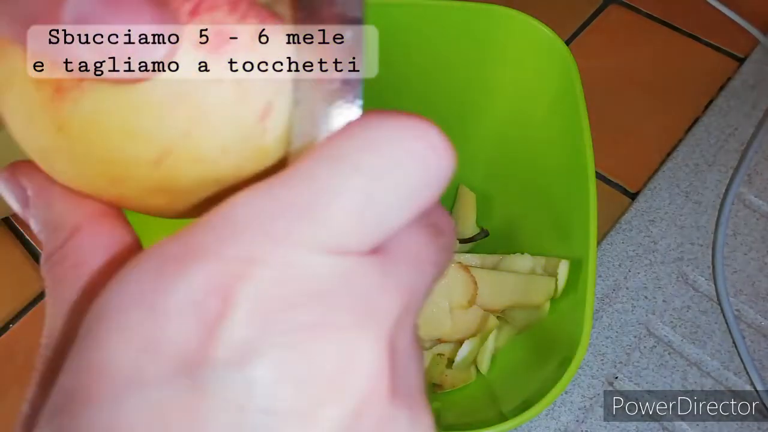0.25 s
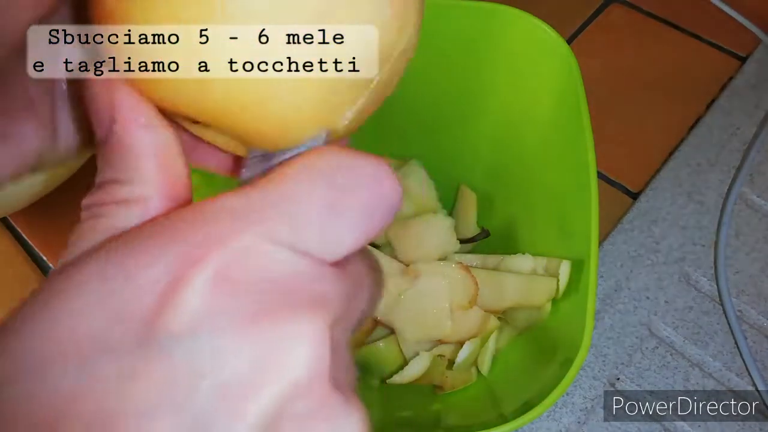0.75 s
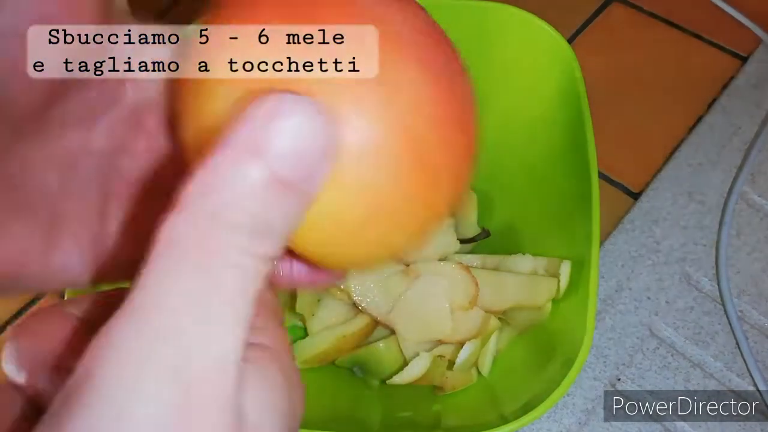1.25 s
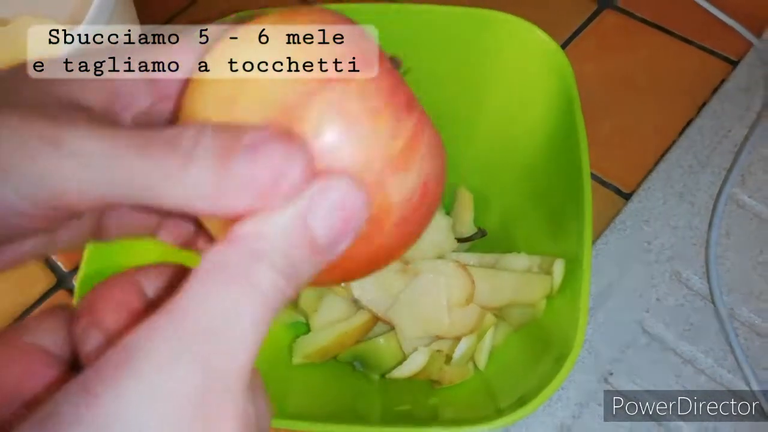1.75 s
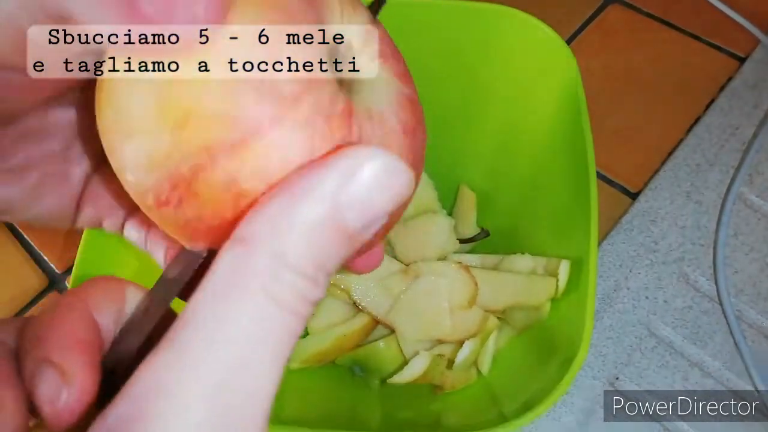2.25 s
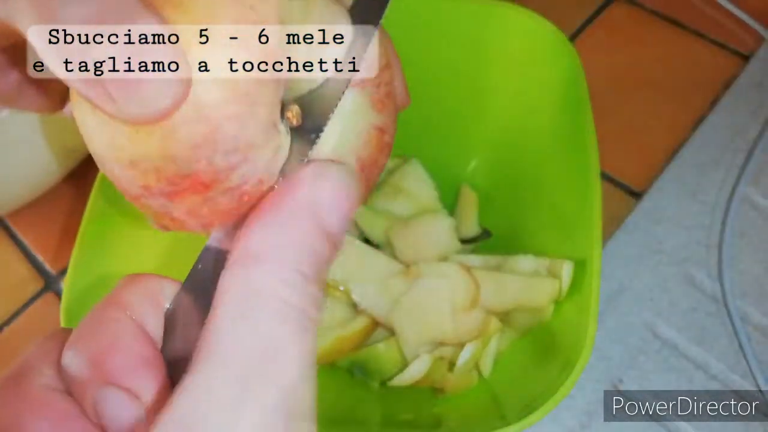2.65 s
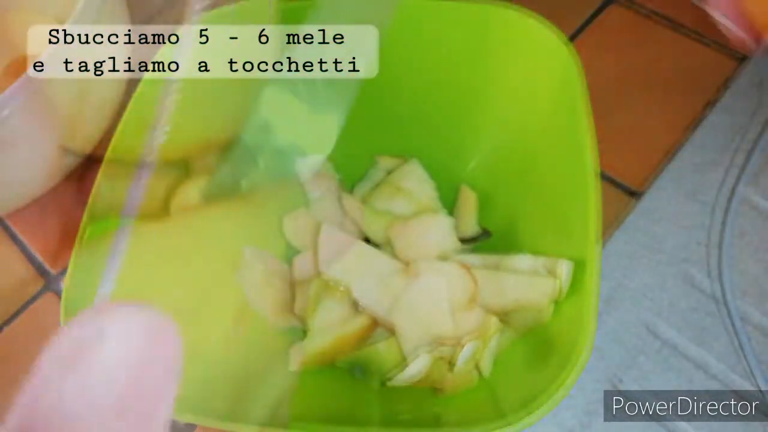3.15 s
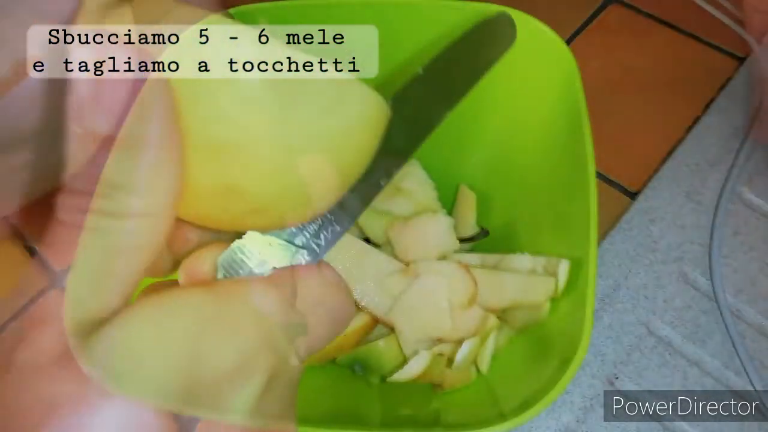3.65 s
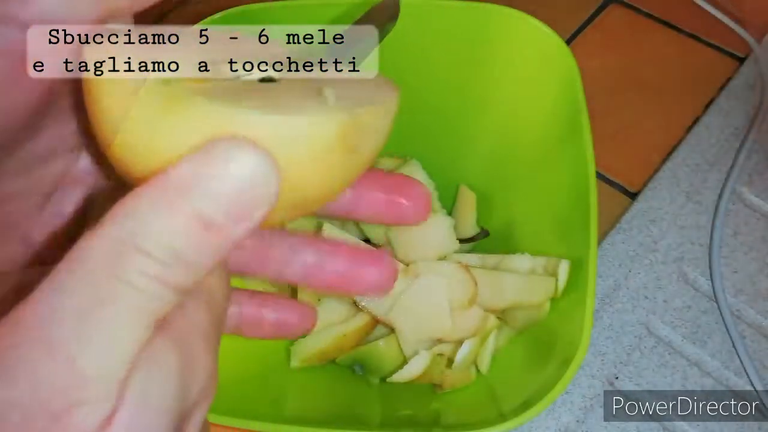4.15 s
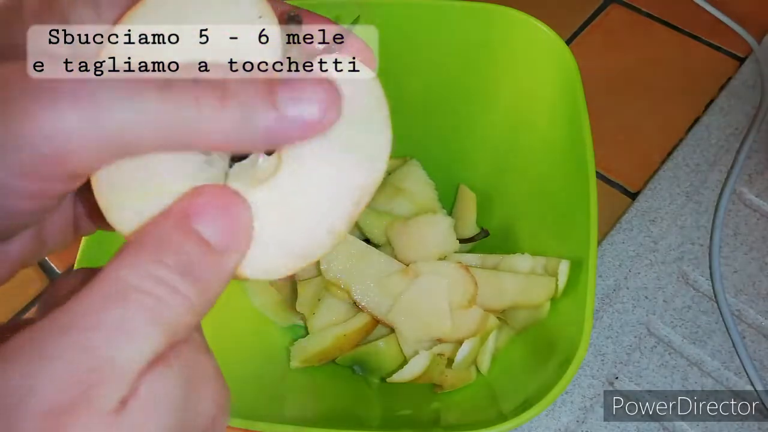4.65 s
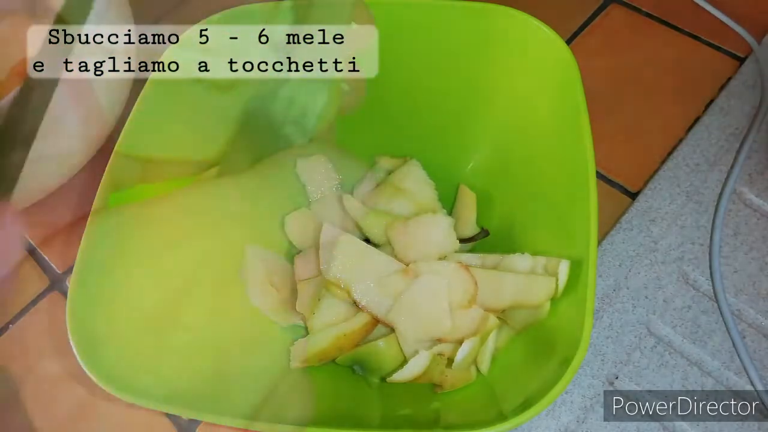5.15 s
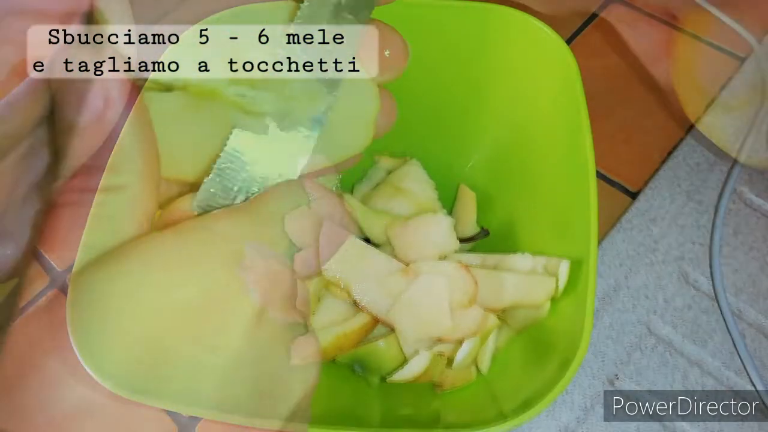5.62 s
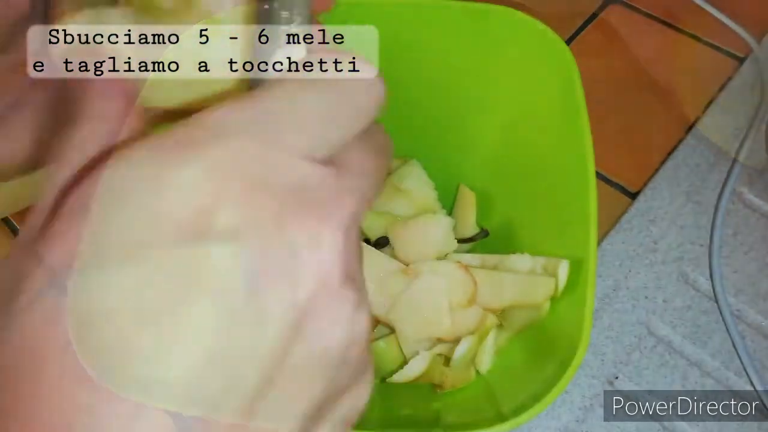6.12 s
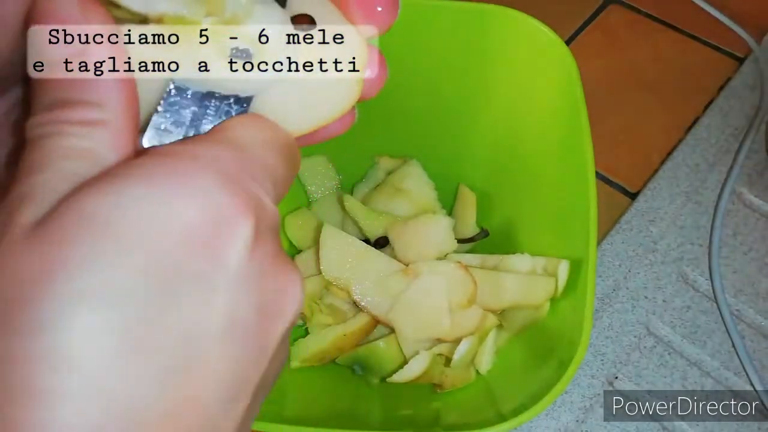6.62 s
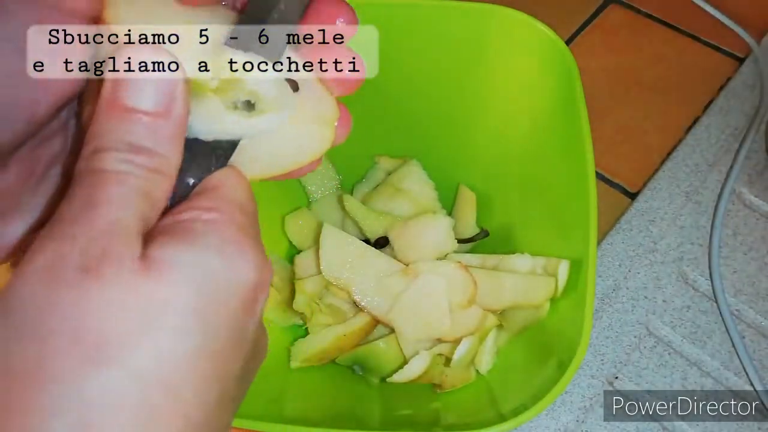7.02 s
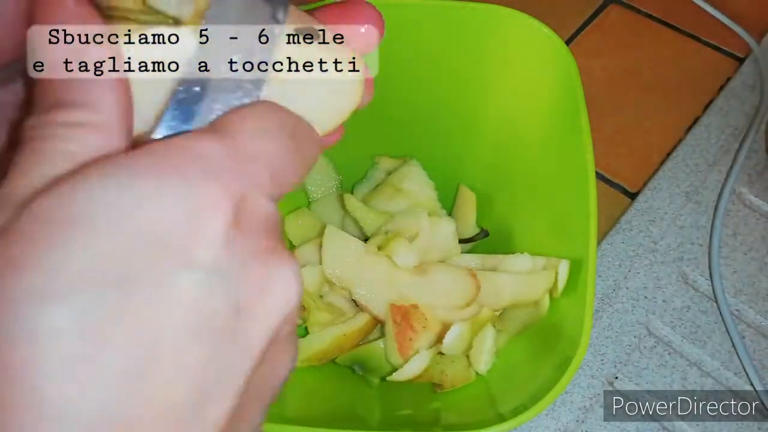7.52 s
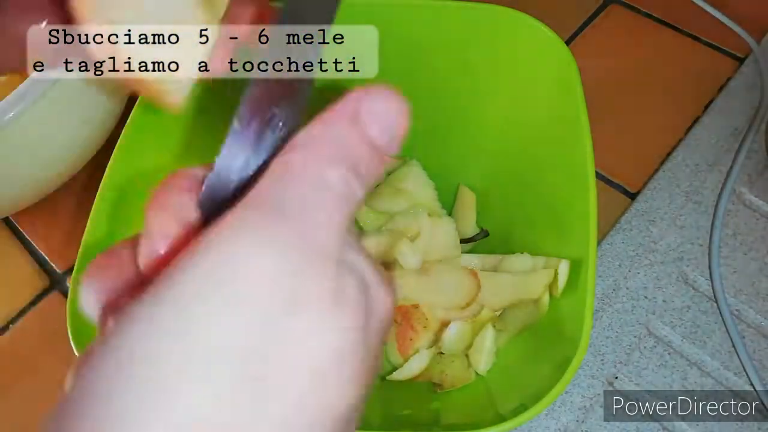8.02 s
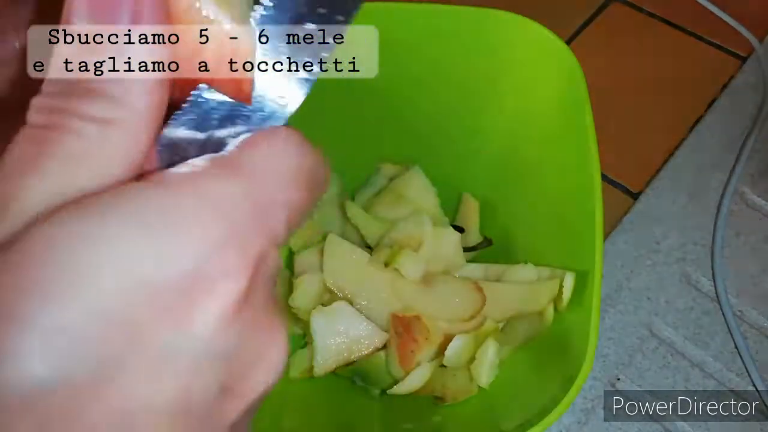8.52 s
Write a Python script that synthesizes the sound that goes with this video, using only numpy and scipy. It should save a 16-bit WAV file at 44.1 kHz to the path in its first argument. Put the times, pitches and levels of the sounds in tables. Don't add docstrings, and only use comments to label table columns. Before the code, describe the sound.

Close, juicy apple cutting with sharp cracks and slicing scrapes in a humming tiled kitchen; halfway it turns double speed, and a piece clatters into plastic.

```python
import sys
import numpy as np
from scipy import signal
from scipy.fft import rfft, irfft
from scipy.io import wavfile
from scipy.ndimage import uniform_filter1d

SR = 44100
rng = np.random.default_rng(int(sys.argv[2]) if len(sys.argv) > 2 else 0)


def voltage_ratio(level):
    return 10 ** (np.asarray(level, float) / 20)


def wrap_up_sound(samples):
    columns = np.atleast_2d(samples).T
    tamed = np.clip(columns, -1, 1)
    steps = np.round(tamed * 32767).astype(np.int16)
    wavfile.write(sys.argv[1], SR, steps)


N = 387198

FIRST_CUT_S, FAST_FROM_S = 3.399, 5.497
T = np.arange(N) / SR
SPEED = np.where(T < FAST_FROM_S, 1, 2)
HZ = np.maximum(np.fft.rfftfreq(2 ** 19, 1 / SR), 1)

# [t/s, length/s, first level/dB, last level/dB, low-part level/dB]
HALVING_SLIDES = [(0, 0.29, -51, -87, 4), (.43, 0.06, -48, -47.5, -2), (.5, 0.21, -54.5, -62.5, 22.5),
                  (.74, 0.069, -25.5, -38.5, 3), (.83, 0.056, -37, -44, 10.5), (.905, 0.017, -27, -38.5, 9),
                  (.94, 0.067, -33.5, -34, 10), (1.02, 0.064, -46, -45, 7), (1.1, 0.22, -50, -46.5, 5.5),
                  (1.33, 0.12, -43.5, -49, 4), (1.46, 0.078, -47.5, -47.5, 7), (1.55, 0.089, -57, -58, 8),
                  (1.65, 0.13, -45.5, -35, 4), (1.81, 0.17, -33, -35.5, 2.5),
                  (2.175, 0.069, -36, -38.5, 4.5), (2.26, 0.044, -46, -52, 7),
                  (2.315, 0.037, -41.5, -42.5, 3), (2.365, 0.13, -41.5, -36, 1),
                  (2.5, 0.075, -35, -22, -0.5), (2.587, 0.81, -54.5, -70.5, 7), (3.33, 0.054, -59, -41, 5),
                  (3.485, 0.31, -54.5, -47.5, 5.5), (3.8, 0.1, -35, -71, 10.5),
                  (3.885, 0.16, -31.5, -33, 7.5), (4.06, 0.052, -49, -44, 12.5),
                  (4.43, 0.042, -46, -29.5, 3.5), (4.465, 0.34, -30.5, -45.5, 7),
                  (4.78, 0.16, -63, -62, 11), (5.0, 0.45, -45, -64, 6.5)]
CORING_SLIDES = [(5.504, 0.075, -43, -47, -9), (5.699, 0.086, -61, -38, -2), (5.844, 0.052, -46, -40, 0.5),
                 (6.274, 0.06, -58, -64, -4), (6.328, 0.15, -50.5, -42, 2), (6.496, 0.17, -43, -55, 1),
                 (6.654, 0.21, -57, -58, 5), (6.906, 0.02, -59, -52.5, 3), (6.95, 0.15, -72, -49, -8),
                 (7.082, 0.14, -53, -50.5, -4), (7.597, 0.18, -38.5, -39, 1.3),
                 (7.791, 0.08, -55, -49.5, -1), (7.91, 0.11, -44, -67, -1), (8.2, 0.17, -69, -55, 12.5),
                 (8.547, 0.25, -46, -39.5, 1.5)]
EDGE_S, RELEASE_S, SLIDE_PAN_DB = 0.021, 0.017, 2.2
HANDLING_DB, HANDLING_LOW_DB = -69, -3
# [t/s, peak level/dB, low-part level/dB, top-part level/dB, T60/s]
HALVING_JERKS = [(0.5018, -13, 4.5, 3, 0.023), (0.5266, -16.5, 4, -1.5, 0.032),
                 (0.56, -17.5, -1, -1, 0.038), (.607, -17, 0.5, 1.5, 0.022),
                 (0.6624, -18.5, -2.5, -2.5, 0.061), (0.737, -24.5, 7.5, -0.5, 0.07),
                 (0.838, -17, -3, -3, 0.024), (0.883, -18.5, 3, -4, 0.025), (.946, -28.5, 8.5, -10, 0.088),
                 (1.082, -25, -11, -7, 0.014), (1.774, -18, 2.5, 2.5, 0.011), (1.81, -24, 3, -2, 0.065),
                 (2.847, -42, 6, 8.5, 0.028), (3.477, -19, 5, 1, 0.045), (3.683, -17.5, -0.5, -3.5, 0.034),
                 (3.799, -22, 2, 5.5, 0.023), (3.834, -18.5, 0.5, 1, 0.03), (4.095, -27.5, 4, -1, 0.028),
                 (4.721, -14, -3, -21, 0.021), (4.75, -31, -18, 2, 0.034), (4.9328, -19, -1, -7, 0.018),
                 (5.062, -24, 1, 2, 0.055), (5.11, -26.5, -4, 0, 0.017)]
CORING_JERKS = [(5.498, -24.5, 4, -11, 0.034), (5.568, -14, -11, -3, 0.022), (5.595, -33, -3, 0, .015),
                (5.606, -19, 0.5, 5, 0.017), (5.708, -28.5, 0, 4, 0.025), (5.785, -33, 7, 3, 0.031),
                (5.793, -32, -9, 0, 0.064), (5.913, -27, -3, -5, 0.013), (6.3405, -33, -2, -4, 0.037),
                (6.356, -40, 3, -5, 0.018), (6.369, -48, 1, -5, 0.02), (6.392, -21.5, 0.5, -8, 0.02),
                (6.404, -30, -1, -3, 0.021), (6.43, -27, -4, 3, 0.018), (6.472, -23, 2, 6.5, 0.021),
                (6.484, -24.5, 2.5, 3, 0.023), (6.555, -17.5, -4, 2.5, 0.019), (6.566, -20.5, -1, -4, 0.02),
                (6.6452, -22.5, -4, 4, 0.024), (6.656, -36, 0, -6, 0.022), (7.117, -21, -8, -2, 0.018),
                (7.226, -32.5, -1, -3, 0.023), (7.767, -31, -5, -3, 0.024), (7.926, -29, -7, 2, 0.043),
                (8.283, -36, 13.5, -4, 0.039), (8.3158, -20.5, 10, -15, 0.019), (8.324, -39, 12, -9, 0.088),
                (8.58, -41, 10.5, 0, 0.065)]
SWELL_S, SWELL_SHARE, JERK_PAN_DB = 0.0073, 0.14, 0.5
# [t/s, peak level/dB, low-part level/dB,
# top-part level/dB, left over right/dB]
SNAPS = [(0.506, -5, 5, -4, 2), (0.5089, -7, 0, 3, 4), (0.5146, -11, 0, -7, 4), (0.63, -27, -3, -5, 2),
         (0.7457, -15, 5, -4, 2), (0.75, -15, -4, -1, 4), (.836, -14, -3, 5, 1), (0.8413, -1, -9, -4, 4),
         (0.8429, -0.5, 0, 2, 4), (0.854, -4, -8, 2, 3), (0.9099, 2.5, 0, -4, 2), (.9438, -18, 5, -3, 2),
         (0.958, -7, -17, 2, 10), (0.967, -16, 14, -4, 0), (0.986, -7, 12, -5, 9), (.992, -10, 2, -2, 7),
         (1.018, -10, 2, -10, 3), (1.086, -1, -3, -11, 6), (1.773, -25, -5, 0, 1), (1.777, -9, -11, 8, 0),
         (1.813, -6.5, 5, -3, 4), (1.827, -23, -2, -7, 3), (2.516, -20, -7, 12, -3),
         (2.5794, -13, 23, -7, 3), (2.693, -37, -20, 3, 3), (2.7096, -31, -18, 6, -3),
         (2.7275, -37, -16, 3, 6), (2.737, -33, -20, 9, 3), (2.745, -28.5, -25, 8, 10),
         (2.804, -29, -15, 0, 3), (2.856, -23, -10, 4, 12), (2.87, -32, -10, 3, 3),
         (3.4905, -18, -6, 6, -2), (3.806, -29, -17, 0, 0), (4.4347, -27, -5, 6, 4),
         (4.467, 3.5, 0.5, -18, 8), (4.478, -18, 3, -12, 3), (4.5041, -5, 7, -13, -1),
         (4.565, -14, 21, -4, 2), (4.6104, -4.5, -10, -9, 9), (4.6285, -3.5, -5, -5, 7),
         (4.6922, -18, 0, -5, 2), (4.7257, 1, 8.5, -16, 2), (4.738, -16, -8, 3, -3),
         (4.937, 0, -1, -0.5, 4), (5.0729, -9, -8, 2, 10), (5.3712, -29, 6, 5, -6),
         (5.514, -24, -5, 0, 2), (5.535, -25, -5, 1, 3), (5.5412, -5.5, -8, -3, 6),
               (5.5728, -6, -9, 0, 9), (5.598, -17, 2, 0, -3), (5.6085, -9, -4, 10, 9),
               (5.614, -16, -4, 3, 3), (5.709, -8, -5, 8, -2), (5.7122, -14, -10, 3, 7),
               (5.723, -20, -6, 2, 5), (5.7454, -16, -9, 9, -4), (5.7735, -10, -5, 6, 8),
               (5.7845, -10, -5, 2, -3), (5.916, -14, -4, -2, 1), (5.931, -15.5, 4, 6, 1),
               (5.961, -26, -8, 4, 1), (6.2894, -36, -8, 0, 2), (6.3174, -33, -5, 0, 2),
               (6.5605, -11, -5, 4, -1), (6.6376, -18, -8, 0, 2), (6.645, -22, -1, 0, 3),
               (6.649, -13, -7, 4, 2), (7.08, -16, -16, 1, 12), (7.118, 3, -22, -1, 1),
               (7.119, -3, -12, -4, 8), (7.19, -18, -9, -3, -4), (7.4694, -37, 0, 6, 3),
               (7.608, -17, -3, -3, 5), (7.931, -26, -10.5, 0, 9), (7.9635, -13.5, 0, -1, 4),
               (8.0149, -29, 10, 0, -5), (8.1156, -28, 9, 2, -2), (8.318, -1, 0, 4, -11),
               (8.3203, -12, 0, 0, -7)]
CRACKS = SNAPS
# [f/Hz, level per Hz/dB]
FLESH_SLOW = [(400, -50), (720, -42.5), (860, -18), (1300, -14), (2200, -12.5), (4500, -10.5), (6200, -9),
              (8300, -7.5), (10200, -1.5), (11800, -9.5), (13500, -17.5), (15500, -20.5)]
FLESH_FAST = [(900, -26.5), (2000, -17), (3300, -5.5), (6000, -2.5), (8500, -2), (11000, -2.5),
              (14000, 0.5), (16500, -6)]
PARTS_HZ = {1: (3500, 7200), 2: (5500, 10500)}
LEFT_LEAD = 10
SHARED = .4
HAND_ECHO, HAND_DELAY_S = .45, .0005
KITCHEN_DB, KITCHEN_T60_S = -11, 0.28

# [f/Hz, rms level/dB, flutter/dB]
FRIDGE = [(80, -63, 3), (90, -63, 3), (100, -42, 0), (110, -53.5, 2.5), (130, -57, 1.1), (140, -66, 2),
          (150, -64, 2), (160, -60, 1.5), (180, -65, 2), (190, -65, 1.5), (344.5, -69, 2)]
# [t/s, level/dB]
IDLE = [
    (0, -36.5),
    (.66, -36),
    (.89, -39),
    (1.05, -37),
    (1.77, -35),
    (2.15, -29),
    (2.5, -30.5),
    (2.95, -43.5),
    (3.4, -37),
]
IDLE_HZ, IDLE_SAG_HZ_PER_S, IDLE_WANDER_HZ = 49.5, .35, 0.32
# [ratio, level/dB]
LEAVING = [
    (3.4, 45.8, -35.5),
    (3.9, 43.7, -33),
    (4.3, 41.1, -40.5),
    (4.52, 42.8, -46),
    (5.0, 45.2, -67),
    (5.3, 45.2, -42),
    (5.5, 46, -56),
]
LEAVING_ORDERS = [(.76, -18), (1, -2), (1.2, -25), (3.1, -22.5), (6.2, -29.5), (9.3, -31.5)]
# [t/s, f/Hz, level/dB]
REVVING = [
    (5.5, 52.5, -65),
    (5.7, 55.1, -59),
    (6.45, 49.7, -58),
    (6.95, 57.6, -57),
    (7.33, 65.9, -41.5),
    (7.7, 74.86, -59),
    (8.2, 87.2, -45),
    (8.45, 91.4, -46),
    (8.78, 96, -42),
]
HOLDING = [
    (5.9, 60.5, -65),
    (6.4, 62.16, -50),
    (6.92, 61.17, -55),
    (7.5, 63.3, -51),
    (7.85, 58.4, -56),
    (8.4, 65.5, -48),
    (8.52, 75.9, -58),
    (8.62, 80.6, -48),
    (8.78, 83.2, -46),
]
SECOND_ORDER_DB = -5.5

AIR_SLOW, AIR_SLOW_DB = [(15, -12), (25, -8), (53, -14.5), (70, -19), (103, -10.5), (190, -20.5),
                         (225, -30), (335, -20.5), (480, -29.5), (700, -27.5), (1000, -31.5), (1600, -32),
                         (5100, -44), (9700, -43.5), (15000, -50)], -47.5
AIR_FAST, AIR_FAST_DB = [(25, -17), (53, -16.5), (90, -6), (140, -19.5), (200, -5.5), (380, -20),
                         (450, -24.5), (630, -18), (685, -16.5), (750, -22), (1230, -29), (2050, -26.5),
                         (4850, -34), (11000, -40), (16000, -43)], -50.5
# [f/Hz at normal speed, left-right likeness]
LIKENESS = [(40, .99), (130, .95), (200, .8), (290, .4), (640, -.35), (1400, .1), (3000, 0)]

# [t/s, peak level/dB, second-mode f/Hz, second-mode level/dB]
JOLTS = [
    (0.5085, -19.5, 1110, -9),
    (.75, -24.5, 1200, 10),
    (0.845, -24, 1500, 0),
    (2.578, -23.5, 1150, -7),
    (3.487, -27.5, 1150, -12),
    (3.691, -23.5, 1190, -3),
    (4.467, -44, 1082, 0),
    (7.119, -41.5, 500, -1),
]
# [f/Hz, level/dB, T60/s]
FRUIT = [(325, -20.5, .06), (872, 0, .035)]
GRIP_T60_S, FRUIT_CUT_HZ = .028, 874

# [t/s, swell/s, fade/s, peak level/dB]
RUBS = [
    (1.17, 0.24, 0.24, -37),
    (2.162, 0.033, 0.21, -35),
]
RUB_DEPTH_DB = 20
PALM = [(1.17, 1610), (1.4, 1650), (1.6, 1740), (2.16, 1720), (2.4, 1610)]
PALM_WIDTH_HZ = 280

# [f/Hz, level/dB, T60/s]
CHATTER = (6.337, .065, -41)
BLADE = [(3450, 2, .015), (7400, 0, .004), (8600, 1, .005)]

# [f/Hz, level/dB, T60/s]
DROPS = [
    (8.263, -33),
    (8.2695, -32),
    (8.2835, -23),
    (8.2885, -14),
    (8.2935, -10),
    (8.299, -19),
]
BOWL = [(500, -17, 0.036), (680, -5.5, 0.043), (916, -8, 0.018), (1310, -10, 0.034), (1400, -8, 0.035),
        (1728, 3.5, 0.039), (1900, 4, 0.027), (2080, 3.5, 0.025), (2294, 1, .018), (2910, -2, .012),
        (3360, 0, 0.014), (5800, -19, 0.0094)]
TOP_SLOW_HZ, TOP_FAST_HZ = 15100, 15800


def rms_one(x):
    return x / np.sqrt(np.mean(x ** 2) + 1e-20)


def at_hz(points, hz=HZ):
    table = np.array(points)
    return np.interp(np.log(hz), np.log(table[:, 0]), table[:, 1])


def curve(rows, off):
    s, *columns = np.transpose(rows)
    return [np.interp(T, s, c, left=off, right=off) for c in columns]


def colour(x, points):
    hz = np.maximum(np.fft.rfftfreq(4096, 1 / SR), 1)
    cepstrum = irfft(np.log(voltage_ratio(at_hz(points, hz))))
    cepstrum[1:2048] *= 2
    cepstrum[2049:] = 0
    response = irfft(np.exp(rfft(cepstrum)))[None, :1024]
    return signal.oaconvolve(x, rms_one(response) / 32, axes=1)[:, :x.shape[1]]


def drift(rate):
    knots = int(N / SR * 60) + 2
    r = np.exp(-2 * np.pi * rate / 60)
    slow = signal.lfilter([1], [1, -2 * r, r * r], rng.standard_normal(knots + 200))[200:]
    return np.interp(T * 60, np.arange(knots), rms_one(slow - slow.mean()))


def at_ports(shared):
    late = np.maximum(np.arange(N) - LEFT_LEAD // SPEED, 0)
    return np.array([shared, shared[late]])


def slides(rows):
    out = voltage_ratio(HANDLING_DB) * np.array([[1], [voltage_ratio(HANDLING_LOW_DB)]]) * np.ones(N)
    for s, length, first_db, last_db, low_db in rows:
        span = slice(max(round((s - EDGE_S) * SR), 0), round((s + length + RELEASE_S) * SR))
        age = T[span] - s
        gate = np.clip(np.minimum(age / EDGE_S + .5, (length - age) / RELEASE_S + 1), 0, 1)
        level_db = first_db + (last_db - first_db) * age / length
        out[:, span] += gate * voltage_ratio(level_db) * np.array([[1], [voltage_ratio(low_db)]])
    return out


def strokes(rows, gain_db):
    out = np.zeros((4, N))
    for s, db, low_db, top_db, swell, t60, pan_db in rows:
        at = round(s * SR)
        age = np.arange(min(int(.3 * SR), N - at)) / SR
        rise = np.sin(np.pi / 2 * np.minimum(age / max(swell, 1e-4), 1))
        decay_db = -60 * np.maximum(age - swell, 0) / max(t60, .002)
        shape = rise ** 0.72 * voltage_ratio(db + gain_db + decay_db)
        out[:, at:at + len(age)] += shape * np.array([[voltage_ratio(low_db)], [1], [voltage_ratio(top_db)], [pan_db]])
    return out


def bursting_cells():
    sizes_db = 0.98 * np.minimum(rng.exponential(1, (3, N)), 5)
    cells = (rng.random((3, N)) < .5) * voltage_ratio(sizes_db)
    clumps = rms_one(uniform_filter1d(rng.standard_normal(N), size=90))
    cells = rms_one(cells * rng.choice([-1, 1], (3, N)) * voltage_ratio(2.1 * clumps))
    for s, *_ in CRACKS:
        cells[:, round(s * SR) + 20] = 4
    return np.sqrt(SHARED) * at_ports(cells[0]) + np.sqrt(1 - SHARED) * cells[1:]


def flesh():
    cells = bursting_cells()
    cracks = [(s, db, low_db, top_db, .0006, .006, pan_db) for s, db, low_db, top_db, pan_db in CRACKS]
    jerks = []
    for s, db, low_db, top_db, t60 in HALVING_JERKS + CORING_JERKS:
        swell = (SWELL_S + SWELL_SHARE * t60) / (1 + 0.37 * (s > FAST_FROM_S))
        jerks.append((s, db, low_db, top_db, swell, t60, JERK_PAN_DB))
    slide, slide_low = slides(HALVING_SLIDES + CORING_SLIDES) * voltage_ratio(2.6 * drift(12.0))
    envelopes = strokes(jerks, gain_db=-5.5) + strokes(cracks, gain_db=-18.0)
    low, bright, top, pan = envelopes + np.array([slide_low, slide, slide, SLIDE_PAN_DB * slide])
    pan_db = uniform_filter1d(pan, size=64) / uniform_filter1d(bright, size=64)
    cells = cells * voltage_ratio(pan_db * [[.5], [-.5]])
    parts = ((low, ("low", "low")), (bright, ("high", "low")), (top, ("high", "high")))
    out = np.zeros((2, N))
    for speed, spectrum in ((1, FLESH_SLOW), (2, FLESH_FAST)):
        span = SPEED == speed
        for envelope, kinds in parts:
            split = np.vstack([signal.butter(3, hz, kind, fs=SR, output="sos")
                               for hz, kind in zip(PARTS_HZ[speed], kinds)])
            out[:, span] += signal.sosfilt(split, colour((cells * envelope)[:, span], spectrum))
    return out


def off_hands(x):
    out = []
    for port in x:
        delay = HAND_DELAY_S * voltage_ratio(4 * drift(5)) * SR / SPEED
        out.append(port + HAND_ECHO * port[np.maximum(np.arange(N) - delay.astype(int), 0)])
    return np.array(out)


def kitchen(x):
    age = np.arange(int(.4 * SR)) / SR
    tail = rng.standard_normal((2, len(age))) * voltage_ratio(-60 * age / KITCHEN_T60_S) * (age > .005)
    return voltage_ratio(KITCHEN_DB) * signal.oaconvolve(x, rms_one(tail) / np.sqrt(len(age)), axes=1)[:, :N]


def tone(hz, db):
    phase = 2 * np.pi * np.cumsum(hz) / SR + rng.uniform(0, 2 * np.pi)
    return np.sqrt(2) * voltage_ratio(db) * np.sin(phase)


def hum():
    out = sum(tone(hz * SPEED, db + flutter_db * drift(2.2)) for hz, db, flutter_db in FRIDGE)
    idle_hz = IDLE_HZ - IDLE_SAG_HZ_PER_S * T + IDLE_WANDER_HZ * drift(1.0)
    out = out + tone(idle_hz, curve(IDLE, -150)[0])
    hz, db = curve(LEAVING, -150)
    out = out + sum(tone(hz * ratio, db + order_db) for ratio, order_db in LEAVING_ORDERS)
    for hz, db in (curve(REVVING, -150), curve(HOLDING, -150)):
        second_db = np.minimum(db, -57) + SECOND_ORDER_DB + 3.2 * drift(2.5)
        out = out + tone(hz, db) + tone(2 * hz, second_db)
    return out


def air():
    out = 0
    for speed, spectrum, db in ((1, AIR_SLOW, AIR_SLOW_DB), (2, AIR_FAST, AIR_FAST_DB)):
        mid, side = rfft(rng.standard_normal((2, 2 ** 19))) * voltage_ratio(at_hz(spectrum))
        alike = np.clip(at_hz(LIKENESS, HZ / speed), -1, 1)
        pair = np.sqrt(1 + alike) * mid + np.sqrt(1 - alike) * side * [[1], [-1]]
        out = out + voltage_ratio(db) * rms_one(irfft(pair)[:, :N]) * (SPEED == speed)
    return out


def ring(x, hz, t60):
    r, w = voltage_ratio(-60 / (t60 * SR)), 2 * np.pi * hz / SR
    return signal.lfilter([0, np.sin(w)], [1, -2 * r * np.cos(w), r * r], x + 1e-18)


def knocks(blows, modes, contact_s, rattle):
    out, age = np.zeros(N), np.arange(4096) / SR
    for s, db in blows:
        blow = rattle * rng.standard_normal(4096) * np.exp(-age / contact_s)
        blow[0] = 1
        rings = 0
        for k, (hz, level_db, t60) in enumerate(modes):
            rings = rings + (-1) ** k * voltage_ratio(level_db + rng.normal(0, 2)) * ring(blow, hz, t60)
        out[round(s * SR):][:4096] += voltage_ratio(db) * rings / np.abs(rings).max()
    return out


def jolts():
    out = 0
    for s, db, grip_hz, grip_db in JOLTS:
        speed = SPEED[round(s * SR)]
        body = FRUIT + [(grip_hz, grip_db, GRIP_T60_S)]
        thud, *modes = [(hz * speed, level_db, t60 / speed) for hz, level_db, t60 in body]
        cut = signal.butter(6, FRUIT_CUT_HZ / speed, "high", fs=SR, output="sos")
        out = out + signal.sosfilt(cut, knocks([(s, db)], modes, contact_s=0.005, rattle=.08))
        out = out + knocks([(s, db + thud[1])], [thud], contact_s=0.004, rattle=.05)
    return out


def rubbing():
    lowpass = signal.butter(2, PALM_WIDTH_HZ / 2, fs=SR, output="sos")
    slow = signal.sosfilt(lowpass, rng.standard_normal(N))
    phase = 2 * np.pi * np.cumsum(curve(PALM, 1600)[0]) / SR
    noise = slow * np.cos(phase) + slow[::-1] * np.sin(phase)
    level = 0
    for s, swell, fade, db in RUBS:
        foot_db = db - RUB_DEPTH_DB
        shape_db = curve([(s, foot_db), (s + swell, db), (s + swell + fade, foot_db)], -150)[0]
        level = level + voltage_ratio(shape_db + 2.3 * drift(17.0))
    return rms_one(noise) * level


def chatter():
    s, length, db = CHATTER
    fade = np.clip(1 - np.arange(4096) / SR / length, 0, 1) ** .3
    clicks = np.diff(rng.standard_normal(4096) ** 3, prepend=0) * fade
    bands = sum(voltage_ratio(band_db) * rms_one(ring(clicks, hz, t60)) for hz, band_db, t60 in BLADE)
    out = np.zeros(N)
    out[round(s * SR):][:4096] = voltage_ratio(db) * rms_one(bands)
    return out


def bowl():
    return knocks(DROPS, BOWL, contact_s=0.0043, rattle=0.073)


def scene():
    near = off_hands(flesh())
    held = at_ports(jolts()) * voltage_ratio([[1.8], [-1.8]])
    near = near + at_ports(rubbing() + chatter() + bowl())
    fade = np.clip(np.where(T < FIRST_CUT_S, 1, (T - FIRST_CUT_S) / 0.019), 0, 1)
    return (near + held + kitchen(near) + hum() + air()) * fade


def top_cut(x):
    return signal.sosfilt(signal.butter(12, 16620, fs=SR, output="sos"), x)


def record(dry):
    slow, fast = [signal.sosfilt(signal.ellip(10, 1, 40, hz, fs=SR, output="sos"), dry)
                  for hz in (TOP_SLOW_HZ, TOP_FAST_HZ)]
    return top_cut(np.where(SPEED == 1, slow, fast))


dry = scene()
out = record(dry)
wrap_up_sound(out)
```